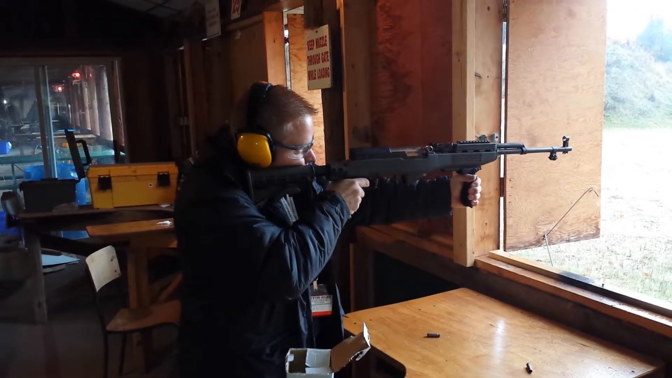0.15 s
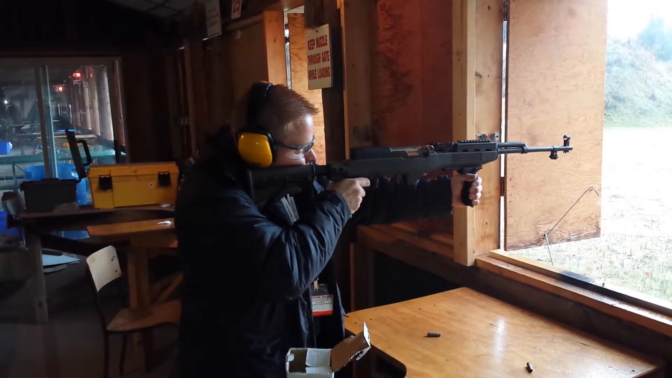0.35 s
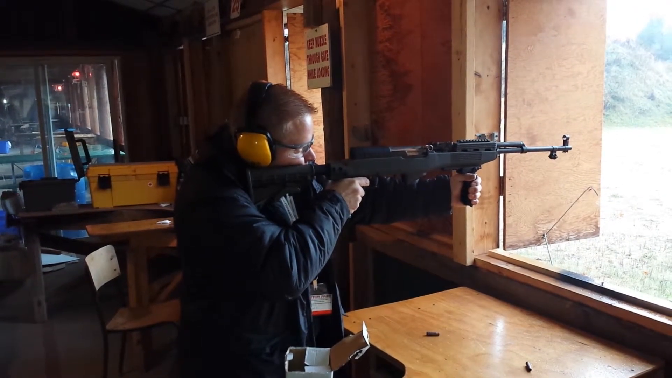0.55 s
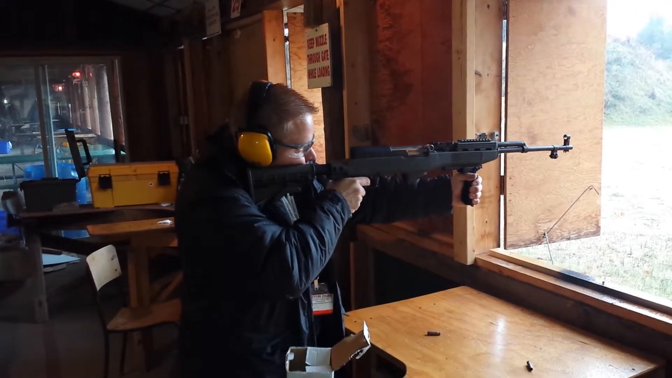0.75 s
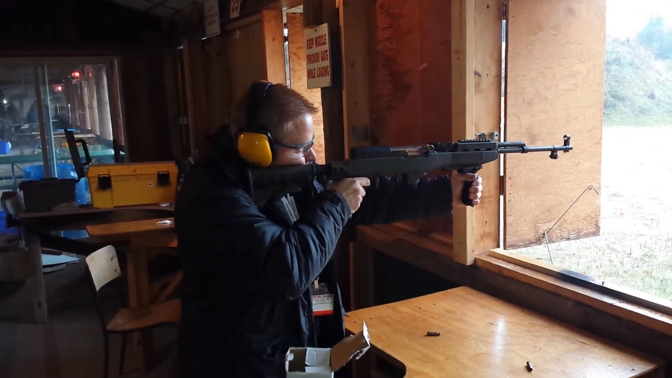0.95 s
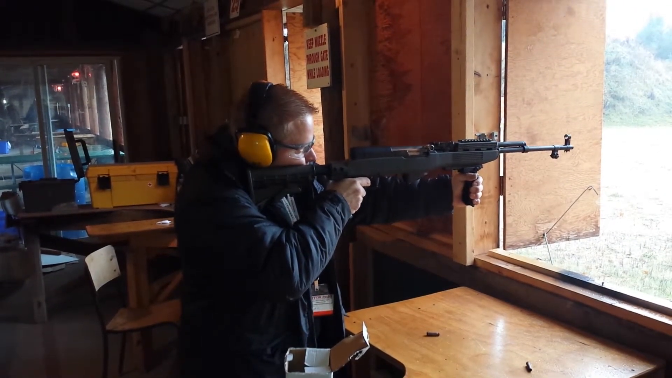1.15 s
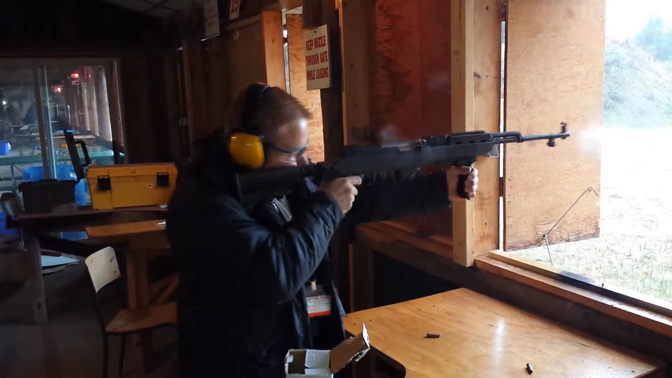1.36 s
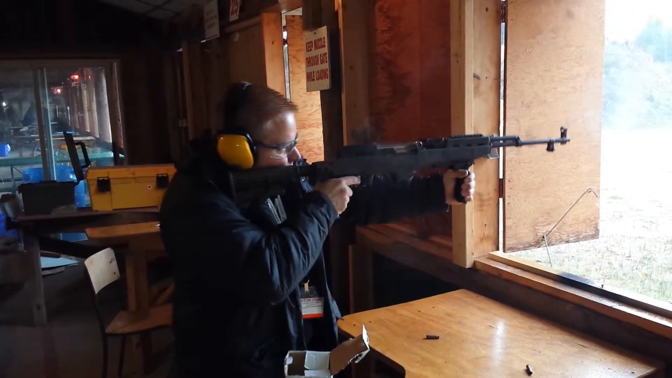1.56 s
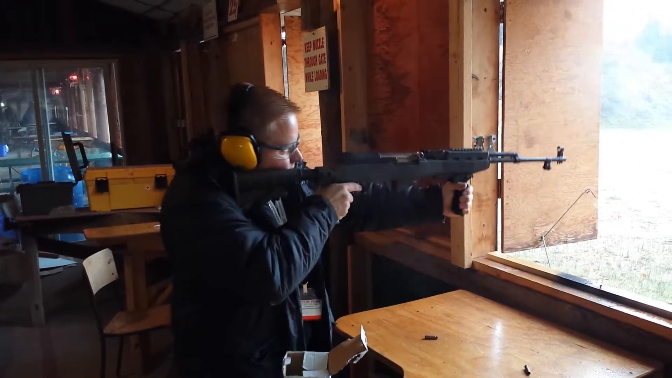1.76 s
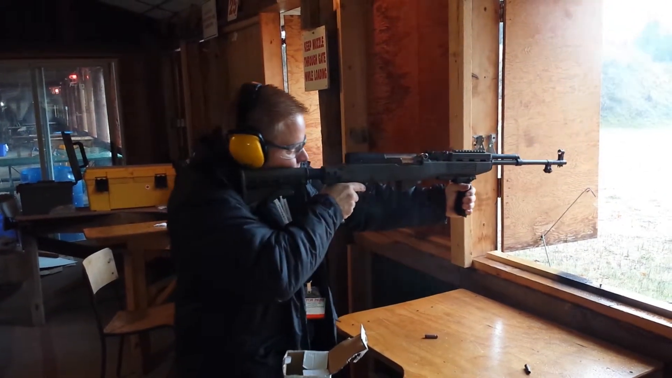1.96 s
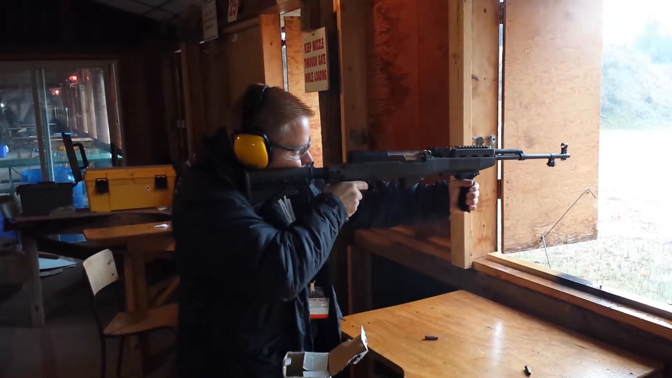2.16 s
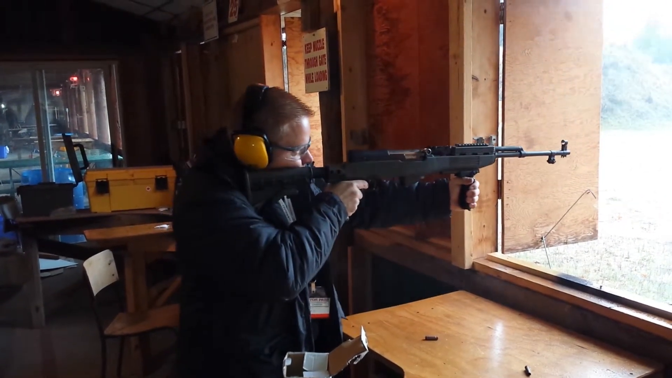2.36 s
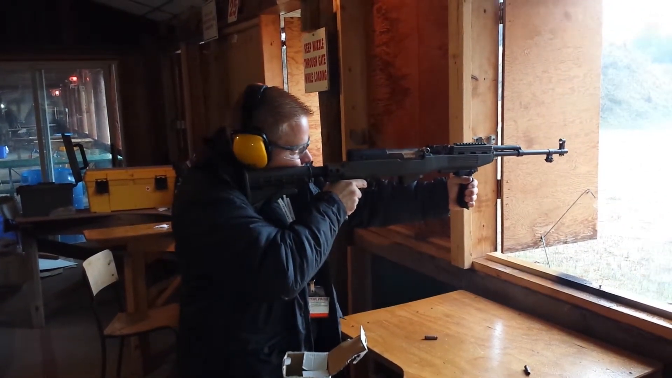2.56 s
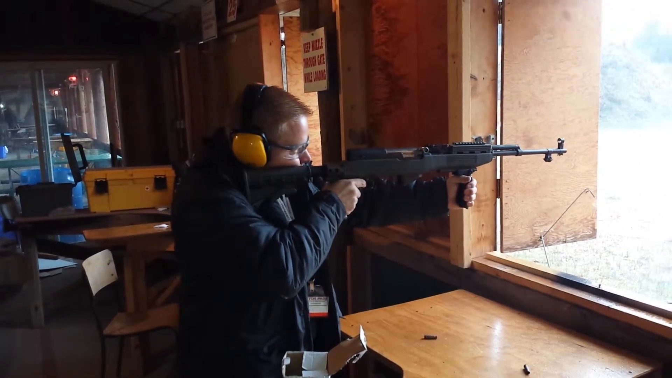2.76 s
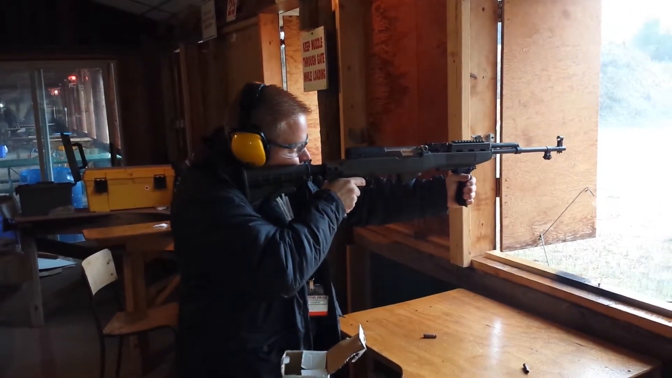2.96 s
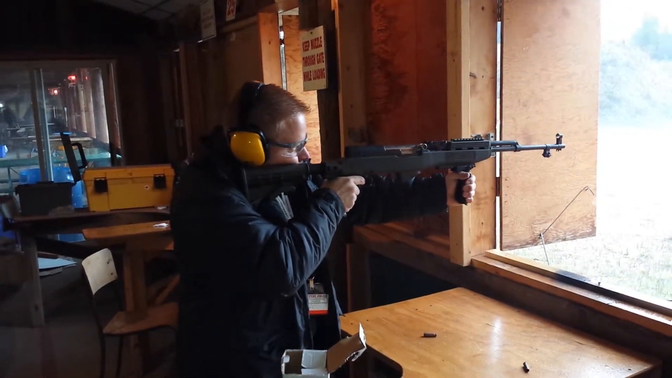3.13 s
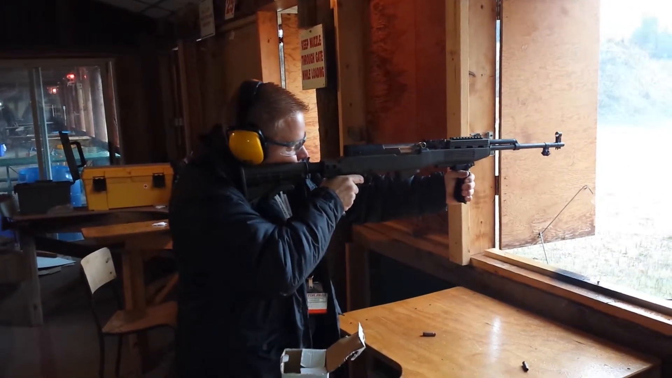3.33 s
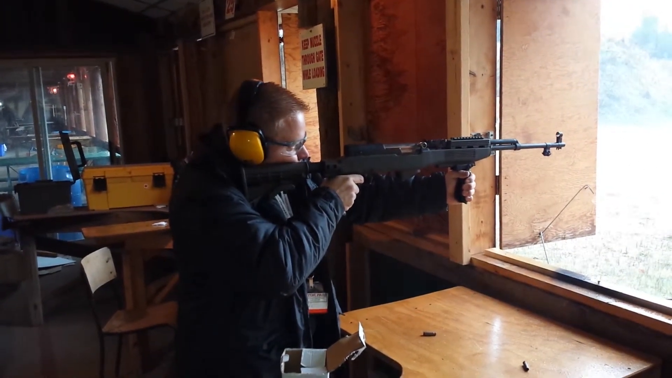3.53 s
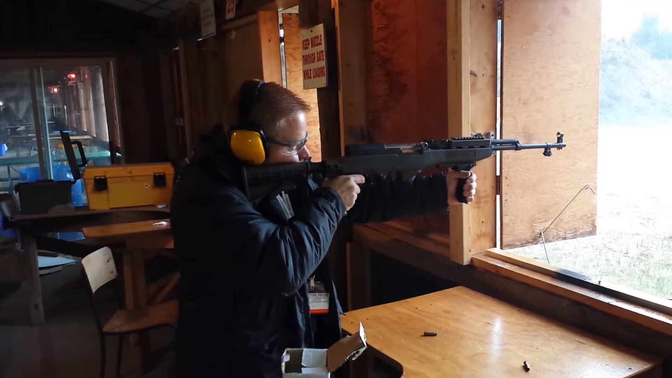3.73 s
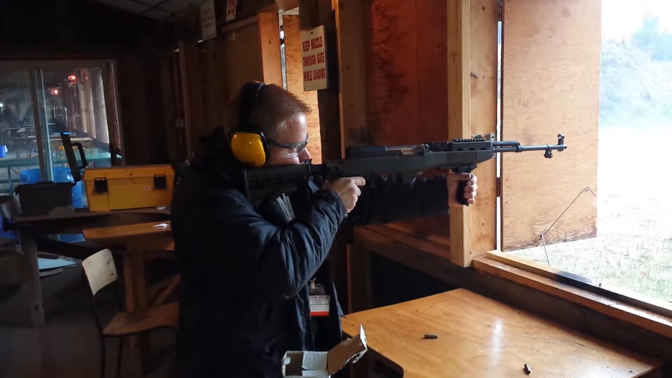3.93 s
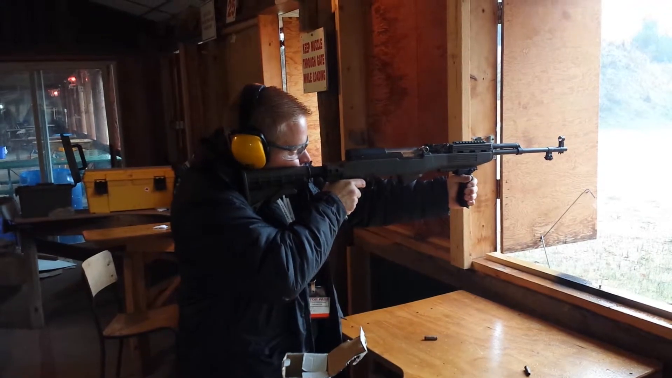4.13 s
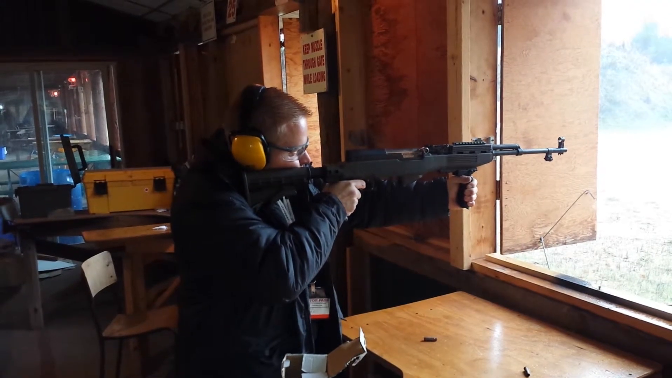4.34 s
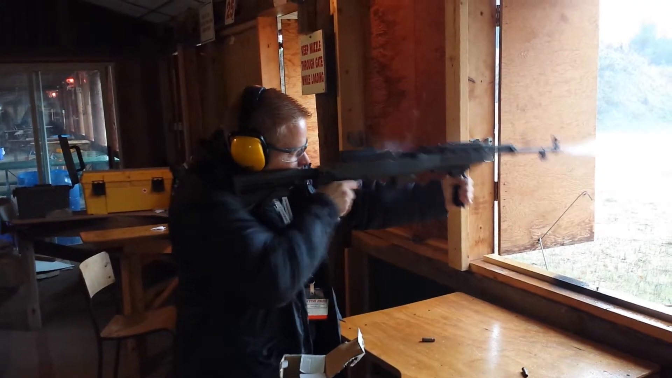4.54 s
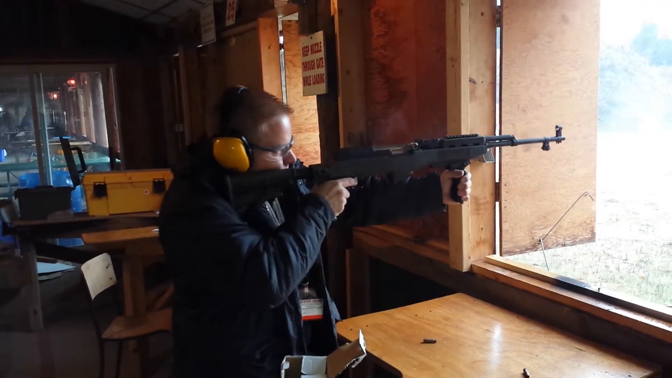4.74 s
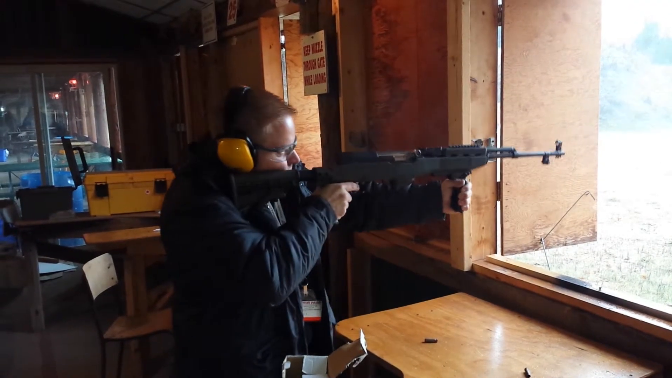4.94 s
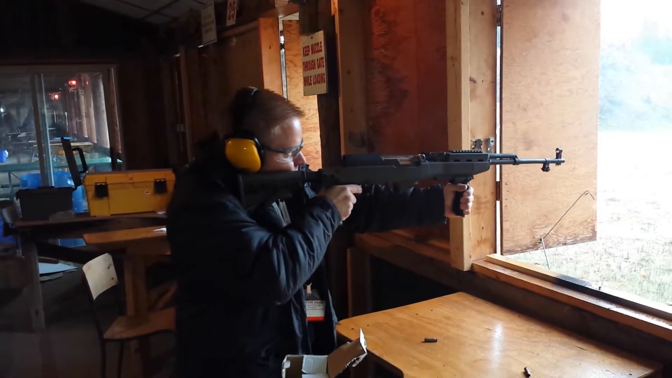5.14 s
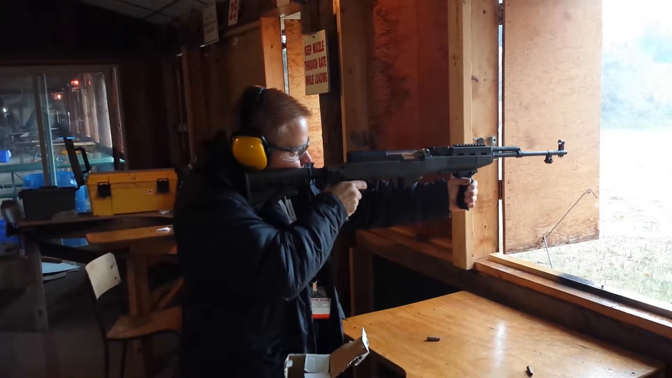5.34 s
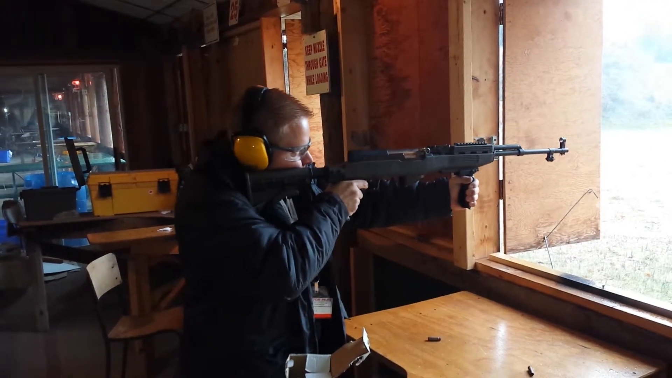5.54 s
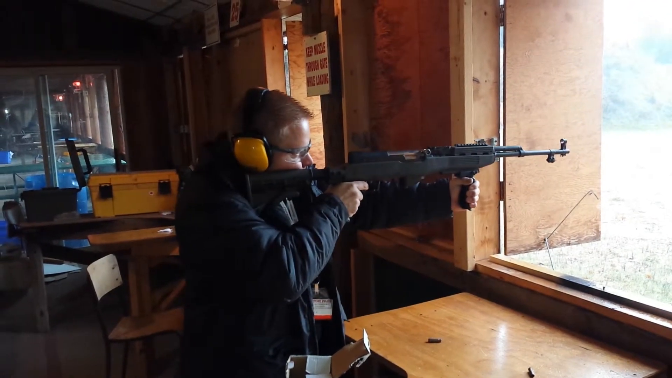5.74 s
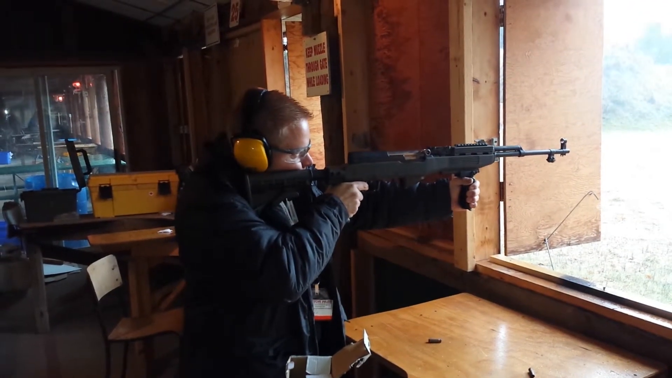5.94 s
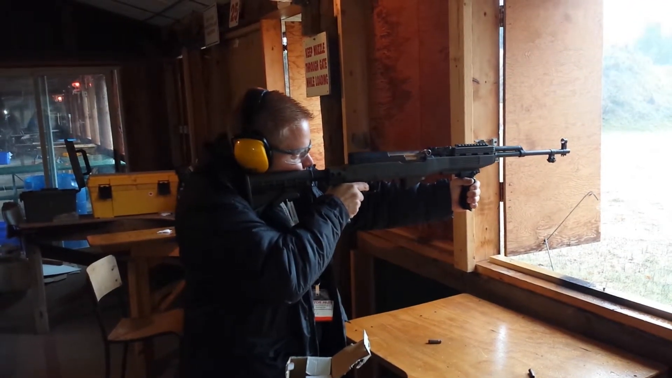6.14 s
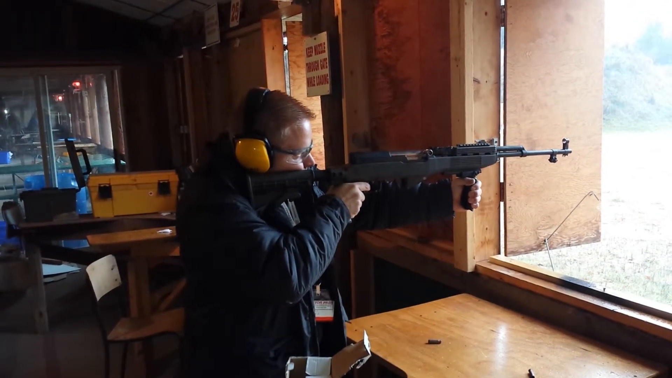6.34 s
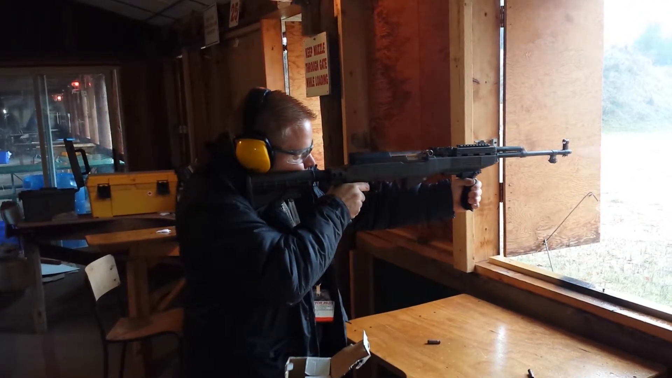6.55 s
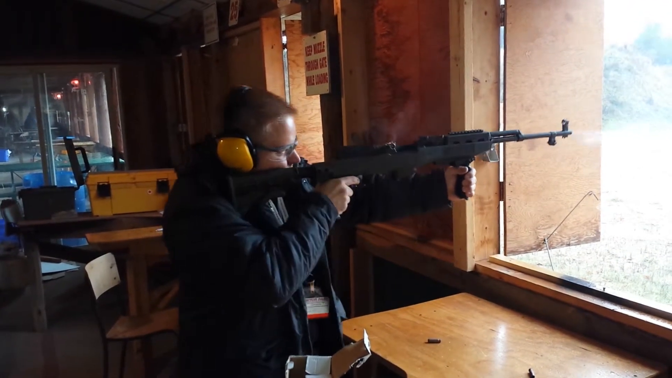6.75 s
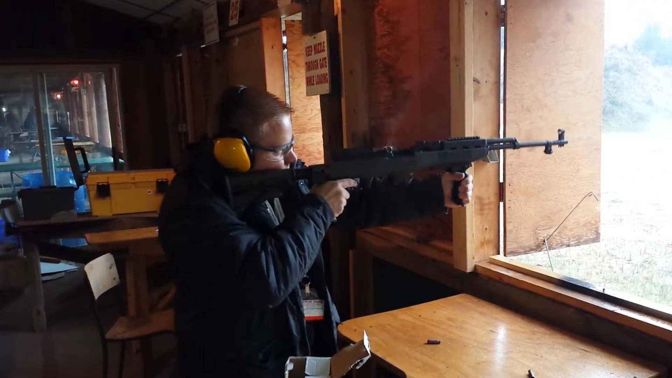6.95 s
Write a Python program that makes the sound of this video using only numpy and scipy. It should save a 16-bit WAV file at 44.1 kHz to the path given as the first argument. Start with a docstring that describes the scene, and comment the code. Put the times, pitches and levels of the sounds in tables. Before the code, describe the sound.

Three identically loud, overloaded rifle blasts, roughly three and then two seconds apart, heard a few steps away inside a wooden range shed. Background air hiss drops under each blast and swells back. Between shots come bright brass ticks on wall and floor, soft cloth brushes, small trigger clicks, a ringing metal clank after the second shot and a hollow wooden knock.

```python
"""Three rifle shots crack and boom inside a wooden shed, a few steps from two spaced microphones.
Each slaps back from the range walls, rolls away outdoors and returns from distant woods as a hollow wash.
Filtered noise makes the blasts, the open air, soft clicks, sleeve rustles and brass on wood and floor;
decaying sines ring a metal fitting. Gain control ducks the background under loud sound and lets it
swell back, while the input stage overloads."""
import sys
import numpy as np
from scipy import signal
from scipy.fft import irfft, next_fast_len
from scipy.io import wavfile
from scipy.ndimage import uniform_filter1d, minimum_filter1d

SR = 44100
rng = np.random.default_rng(int(sys.argv[2]) if len(sys.argv) > 2 else 0)


def digitize_waveform(pressure):
    """Quantize a signal to 16-bit integers and store it at the path in sys.argv[1].

    Rows of a 2-D input are taken as channels; values are limited to [-1, 1].
    """
    field = np.atleast_2d(pressure).T
    bounded = np.clip(field, -1, 1)
    quanta = np.round(bounded * 32767).astype(np.int16)
    wavfile.write(sys.argv[1], SR, quanta)


N = 312669

# Levels are those ahead of gain control; spectra give relative level per Hz.
# Open-air background: [f/Hz, level/dB]
AIR_SPECTRUM = [(15, -45), (25, -15.5), (59, -16), (121, -1), (150, -5), (301, -3), (383, -6.5), (438, -7),
                (729, -8.5), (2130, -10), (2300, -13), (4750, -16), (6370, -14), (12400, -35), (15000, -51)]
AIR_DB = -41.5
# Two spaced microphones, left minus right: [f/Hz, level/dB]
BALANCE = [(100, 1.4), (1300, 1.1), (4400, 3), (8000, 4.5), (10500, -5.5), (14000, -1.5)]
MIC_SPACING_M, SOUND_M_PER_S = 0.15, 343

# Sleeve rustles: [t/s, level/dB, decay time/s]
RUSTLES = [(.100, -40, 0.09), (.510, -39.5, .15), (1.264, -43.5, 0.23), (3.019, -37, 0.057),
           (3.088, -34, .045)]
# A quicker brush is brighter: its centre is this many cycles per decay time.
RUSTLE_CYCLES, RUSTLE_OCTAVES = 93, 2.4
# Clicks of the trigger and action: [t/s, level/dB]
CLICKS = [(.611, -36.5), (3.677, -36), (3.906, -41.5), (4.250, -43.5), (4.416, -29)]
CLICK_HZ, CLICK_OCTAVES, CLICK_S = 4920, 1, 0.044
# Each click also thuds in the stock; its level is relative to the click.
STOCK_DB, STOCK_HZ, STOCK_OCTAVES, STOCK_S = -11, 650, 0.92, 0.09
# Resonances colouring the handling sounds, added to a flat response: [f/Hz, half-width/Hz, level/dB]
HANDLING_MODES = [(3300, 180, -6), (6500, 250, 0)]

# Shots: [t/s, level/dB of the ejected case's tick on the wall]
SHOTS = [(1.3557, 1), (4.6011, -11), (6.6341, 0)]
# Every cartridge is equally loud.
CRACK_DB, BOOM_DB = 27.5, 23.5
# Muzzle crack: [f/Hz, level/dB]
CRACK_SPECTRUM = [(40, -20), (150, -14.5), (600, -14), (1500, -10.5), (3000, -7.5), (5000, -3), (6500, -2),
                  (8000, -4.5), (11000, -12.5), (15000, -23.5)]
# Boom inside the shed: [f/Hz, level/dB]
BOOM_SPECTRUM = [(25, -28), (60, -15.5), (120, -6), (200, -8), (250, -2.5), (320, -4.5), (450, -3),
                 (900, -2), (1500, -2.5), (2300, -3.5), (3500, -7), (6800, -6), (9000, -13.5), (10500, -24),
                 (12000, -42), (14000, -52)]
# Blast thrown back by the range walls: [f/Hz, level/dB]
SLAP_SPECTRUM = [(30, -25.5), (70, -16), (125, -4), (190, -8), (250, -4.5), (320, -9), (440, 3),
                 (750, -3.5), (1900, -1.5), (2700, -6), (4000, -8.5), (6500, -9), (9500, -22), (13000, -44)]
# Outdoor roll: [f/Hz, level/dB]
ROLL_SPECTRUM = [(25, -26.5), (70, -15.5), (105, -4.5), (145, 2.5), (200, -2.5), (260, -1), (340, -6),
                 (500, -11.5), (1000, -8), (3000, -14.5), (6500, -22.5), (10000, -41.5), (14000, -62.5)]
# Decay by 60 dB of the boom in the shed: [f/Hz, t60/s]
SHED_T60 = [(60, 0.69), (150, 0.81), (500, 0.64), (1500, 0.58), (4000, 0.62), (7000, 0.6), (12000, 0.47)]
# Decay by 60 dB of the outdoor roll: [f/Hz, t60/s]
ROLL_T60 = [(60, 3.2), (140, 2.34), (500, 2.31), (2000, 2.12), (8000, 1.5)]
# Standing waves between the shed's walls, added to a flat response: [f/Hz, half-width/Hz, level/dB]
SHED_MODES = [(134.4, 5.4, 3.5), (428.7, 6.6, 3), (478.7, 4.9, 1.5), (502, 5.1, 2.5), (766, 9, 5),
              (1116, 7, -0.5), (1465, 6.2, -1.5)]

# The action throws every case alike, so it ticks on the wall after the same flight.
FLIGHT_S, WALL_HZ, WALL_OCTAVES, WALL_CONTACT_S = 0.27, 6000, 0.35, 0.003
# Falling cases striking wood and metal: [t/s, level/dB, centre f/Hz, contact decay/s]
STRIKES = [(1.984, -6.5, 7240, .013), (5.182, 8.5, 5940, 0.04), (5.724, -19, 4900, 0.011)]
STRIKE_OCTAVES = 0.45
# Extra treble decay, as air and bare wood soak up reverberation: [f/Hz, t60/s]
DAMPING_T60 = [(4000, 20), (7000, 4.7), (10000, 0.95)]

# Cases hopping on the floor: [t/s, level/dB, tilt (0 flat, 1 on end), pitch factor of the low modes]
BOUNCES = [(1.984, -18, 0.47, 1.04), (2.509, -19.5, 0.79, 1), (2.703, -30, 0.99, 1.08),
           (2.767, -39, 0.33, 1), (2.840, -35, 0.28, 1.06), (5.486, -31, 0.92, 1), (5.724, -34, .45, 1.02),
           (5.936, -33, .93, 1.09), (6.010, -36, 0.38, 1.03)]
# Tick of brass on the floor: [f/Hz, level/dB]
TICK_SPECTRUM = [(200, -12), (1500, -3.5), (4000, -1), (6500, 1.5), (9000, -5.5), (11000, -30),
                 (15000, -25)]
# Low modes of a brass case, before the pitch factor: [f/Hz, half-width/Hz, level/dB]
CASE_MODES = [(2105, 80, -1.5), (6750, 240, -4)]
# Top mode of the case from the first and from the second shot: [f/Hz]
CASE_TOP_HZ = [12960, 13560]

# Echo from the woods: [f/Hz, level/dB]
WOODS_SPECTRUM = [(100, -30), (400, -10), (650, -0.5), (850, -3.5), (1150, -6), (1600, -31), (4000, -52)]
# Metal fitting rung by one case: [f/Hz, level/dB, t60/s]
FITTING_MODES = [(3646, 6, 0.32), (3725, -3, 0.22), (3865, 1, 0.2), (6643, 3, 0.12), (7430, 1, .18),
                 (7760, -10, 0.18), (7870, -4, .2)]
FITTING_S = 5.183
# Board knocked by a falling case: [f/Hz, half-width/Hz, level/dB]
BOARD_MODES = [(540, 120, -10), (690, 60, -1), (810, 120, 0), (1170, 70, -4), (1480, 230, -4),
               (1935, 130, 3), (2260, 81, -6), (2660, 240, -5.5)]
BOARD_S = 5.7235
# Upper limit of the recorded band
EDGE_HZ = 14750


def amp(db):
    """Amplitude factor of a level in dB."""
    return 10 ** (np.asarray(db) / 20)


def evened(x):
    """Scales a sound or curve to unit RMS."""
    return x / np.sqrt(np.mean(x ** 2) + 1e-20)


def read(points, hz):
    """Reads a table's second column between its points, on a log frequency scale."""
    f, value = np.transpose(points)
    return np.interp(np.log(hz + 1), np.log(f + 1), value)


def add(mix, s, sound):
    """Lays a sound into the mix at time s, cut at the mix's end."""
    part = mix[:, round(s * SR):][:, :sound.shape[1]]
    part += sound[:, :part.shape[1]]


def axes(size):
    """Sample times and spectrum frequencies of a sound of this size."""
    return np.arange(size) / SR, np.fft.rfftfreq(size, 1 / SR)


def peaks(modes, hz):
    """Summed gain of resonances, each at half its peak one half-width away."""
    return sum(amp(db) / (1 + ((hz - f) / width) ** 2) for f, width, db in modes)


def hump(hz, centre_hz, octaves):
    """Bell-shaped gain on a scale of octaves."""
    return np.exp(-0.5 * (np.log2((hz + 1) / centre_hz) / octaves) ** 2)


def diffuse(gain, likeness=0.99):
    """Sound from all sides at two spaced microphones: alike in the bass, unrelated in the treble."""
    hz = np.linspace(0, SR / 2, len(gain))
    a, b = rng.standard_normal((2, len(hz))) + 1j * rng.standard_normal((2, len(hz)))
    same = likeness * np.sinc(2 * hz * MIC_SPACING_M / SOUND_M_PER_S)
    lean = amp(read(BALANCE, hz) / 2)  # half the balance on each side
    left = a * lean
    right = (same * a + np.sqrt(1 - same ** 2) * b) / lean
    return evened(irfft(gain * np.array([left, right])))


def fade(x, t60):
    """Lets each frequency band die at its own speed."""
    hz, t, bands = signal.stft(x, SR, nperseg=512)
    bands = bands * amp(-60 * t / read(t60, hz)[:, None])
    return signal.istft(bands, SR)[1][:, :x.shape[1]]


def swell(t, delay_s, rise_s, fall_s):
    """Envelope of a scattered echo: smooth rise around the delay, then exponential fall."""
    rise = (1 + np.tanh((t - delay_s) / rise_s)) / 2
    return rise * np.exp(-np.maximum(t - delay_s, 0) / fall_s)


def wander(t, low_hz, high_hz):
    """Random curve of unit RMS, a sum of sines with random phases."""
    rates = np.geomspace(low_hz, high_hz, 20)
    return evened(sum(np.sin(2 * np.pi * (f * t + rng.random())) for f in rates))


def knock(gain, contact_s, room_db=-7):
    """A decaying contact over a short room tail, which a brief tick feeds less."""
    sound = diffuse(gain)
    t = np.arange(sound.shape[1]) / SR
    fed = min(np.sqrt(contact_s / 0.015), 1)
    room = amp(room_db) * fed * np.exp(-t / 0.06)
    attack = np.minimum(t / 0.001, 1)
    return sound * np.hypot(np.exp(-t / contact_s), room) * attack


def air():
    """The steady hiss and rumble of the open air, as shaped diffuse noise."""
    _, hz = axes(size=2 * next_fast_len(N // 2 + 1))
    return (amp(AIR_DB) * diffuse(amp(read(AIR_SPECTRUM, hz))))[:, :N]


def handling_colour(hz, dull_hz=8000):
    """Two resonances under a treble roll-off."""
    return (1 + peaks(HANDLING_MODES, hz)) / (1 + (hz / dull_hz) ** 6)


def rustles(rise_s=0.004):
    """Sleeve brushes: broad noise, brighter for a quicker stroke."""
    t, hz = axes(size=SR)
    out = np.zeros((2, N))
    onset = np.minimum(t / rise_s, 1)
    for s, db, length_s in RUSTLES:
        gain = handling_colour(hz) * hump(hz, RUSTLE_CYCLES / length_s, RUSTLE_OCTAVES)
        add(out, s, amp(db) * onset * knock(gain, length_s, room_db=-6.5))
    return out


def clicks(rise_s=0.004):
    """Trigger and action click softly through two resonances, with a thud in the stock."""
    t, hz = axes(size=SR)
    out = np.zeros((2, N))
    onset = np.minimum(t / rise_s, 1)
    for s, db in CLICKS:
        click = knock(handling_colour(hz) * hump(hz, CLICK_HZ, CLICK_OCTAVES), CLICK_S)
        thud = knock(hump(hz, STOCK_HZ, STOCK_OCTAVES), STOCK_S)
        add(out, s, amp(db) * onset * (click + amp(STOCK_DB) * thud))
    return out


def boom(build_s=0.06, slap_db=-8, slap_s=0.098, slap_rise_s=0.013, slap_fall_s=0.043,
         roll_db=-29.5, roll_build_s=0.076, lumps_db=1.24):
    """The blast builds up in the shed, slaps back from the range walls and rolls away in uneven lumps."""
    t, hz = axes(size=2 * SR)
    shed = 1 + peaks(SHED_MODES, hz)
    inside = fade(diffuse(amp(read(BOOM_SPECTRUM, hz)) * shed, likeness=0.75), SHED_T60)
    inside = inside * (1 - np.exp(-t / build_s))
    slap = diffuse(amp(read(SLAP_SPECTRUM, hz)) * shed, likeness=0.7)
    slap = slap * swell(t, slap_s, slap_rise_s, slap_fall_s)
    roll = fade(diffuse(amp(read(ROLL_SPECTRUM, hz)) * shed, likeness=0.95), ROLL_T60)
    roll = roll * (1 - np.exp(-t / roll_build_s))
    lumps = amp(lumps_db * wander(t, 12, 90))
    return (inside + amp(slap_db) * slap + amp(roll_db) * roll) * lumps


def shots(crack_s=0.049, front_s=0.0058):
    """A bright decaying crack with the boom; the muzzle barely moves, so much of the echo repeats."""
    t, hz = axes(size=2 * SR)
    out = np.zeros((2, N))
    usual = boom()
    front = np.minimum(t / front_s, 1) ** 3
    for s, _ in SHOTS:
        crack = diffuse(amp(read(CRACK_SPECTRUM, hz)), likeness=0.3) * np.exp(-t / crack_s)
        echoes = (usual + boom()) / np.sqrt(2)  # half shared, half new, by power
        add(out, s, front * (amp(CRACK_DB) * crack + amp(BOOM_DB) * echoes))
    return out


def wall_ticks():
    """Each ejected case makes one brief, bright contact with the wall."""
    _, hz = axes(size=SR)
    out = np.zeros((2, N))
    for s, db in SHOTS:
        tick = knock(hump(hz, WALL_HZ, WALL_OCTAVES), WALL_CONTACT_S, room_db=-6.5)
        add(out, s + FLIGHT_S, amp(db) * tick)
    return out


def strikes():
    """Falling brass hits wood and metal: sharp contacts whose treble is soaked up."""
    _, hz = axes(size=SR)
    out = np.zeros((2, N))
    for s, db, centre_hz, contact_s in STRIKES:
        hit = knock(hump(hz, centre_hz, STRIKE_OCTAVES), contact_s, room_db=-5.5)
        add(out, s, amp(db) * fade(hit, DAMPING_T60))
    return out


def bounces(tick_s=0.0084, low_db=1, ring_s=0.022, top_width_hz=55, top_s=0.038):
    """Cases tick on the floor; on end they ring the tube's low modes, flat its top mode."""
    _, hz = axes(size=SR)
    out = np.zeros((2, N))
    for s, db, tilt, pitch in BOUNCES:
        top_hz = CASE_TOP_HZ[int(s > SHOTS[1][0])]  # after the second shot, its own case
        angle = tilt * np.pi / 2
        tick = knock(amp(read(TICK_SPECTRUM, hz)), tick_s, room_db=-5)
        low = amp(low_db) * knock(peaks(CASE_MODES, hz / pitch), ring_s, room_db=-8.5)
        top = knock(peaks([(top_hz, top_width_hz, 0)], hz), top_s, room_db=-13)
        add(out, s, amp(db) * (tick + np.sin(angle) * low + np.cos(angle) * top))
    return out


def woods(echo_db=-33.5, delay_s=1.22, rise_s=0.034, fall_s=0.41):
    """Far trees scatter each shot back as a soft, hollow wash."""
    t, hz = axes(size=3 * SR)
    out = np.zeros((2, N))
    for s, _ in SHOTS:
        wash = diffuse(amp(read(WOODS_SPECTRUM, hz)))
        add(out, s, amp(echo_db) * swell(t, delay_s, rise_s, fall_s) * wash)
    return out


def fitting(clank_db=-5, clank_hz=2700, clank_octaves=0.47, clank_s=0.024,
            wash_width_hz=25, wash_s=0.051):
    """A struck metal fitting clanks and rings in pure modes, smeared by reflections into a beating wash."""
    t, hz = axes(size=SR)
    out = np.zeros((2, N))
    clank = knock(hump(hz, clank_hz, clank_octaves), clank_s, room_db=-5.5)
    add(out, FITTING_S, amp(clank_db) * clank)
    for f, db, t60 in FITTING_MODES:
        tone = np.sin(2 * np.pi * (f * t + rng.random((2, 1))))
        add(out, FITTING_S, amp(db - 60 * t / t60) * tone)
    smeared = [(f, wash_width_hz, db) for f, db, _ in FITTING_MODES]
    add(out, FITTING_S, knock(peaks(smeared, hz), wash_s))
    return out


def board(board_db=-6.5, board_s=0.046):
    """A falling case knocks a board, whose resonances sound hollow."""
    _, hz = axes(size=SR)
    out = np.zeros((2, N))
    add(out, BOARD_S, amp(board_db) * knock(peaks(BOARD_MODES, hz), board_s, room_db=-5))
    return out


def scene():
    """Sums all sources as they reach the microphones."""
    background = air() + rustles() + clicks()
    brass = wall_ticks() + strikes() + bounces() + fitting() + board()
    return background + shots() + brass + woods()


def duck(x, threshold_db=-15, depth_db=17, hold_s=0.85, recover_db_per_s=23, ahead_s=0.0063):
    """Gain control with look-ahead: drops quickly on loud sound, holds, then creeps back up."""
    power_db = 10 * np.log10(abs(uniform_filter1d((x ** 2).mean(0), size=400)) + 1e-12)
    over_db = np.clip(power_db - threshold_db, 0, depth_db)
    half = int(hold_s * SR / 2)
    shift = half - int(ahead_s * SR)  # window reaches mostly into the past
    held_db = -minimum_filter1d(-over_db, 2 * half + 1, origin=shift, mode="nearest")
    fall = np.arange(N) * recover_db_per_s / SR
    reduction_db = np.maximum.accumulate(held_db + fall) - fall
    return x * amp(-uniform_filter1d(reduction_db, size=700))


def overload(x, ceiling=0.87):
    """The input stage bends smoothly towards its ceiling."""
    return x / (1 + (x / ceiling) ** 4) ** 0.25


def record(dry, low_cut_hz=40):
    """Gain control, an overloaded input stage, the band limits and full scale."""
    driven = overload(duck(dry))
    driven = signal.lfilter(*signal.butter(1, low_cut_hz, "high", fs=SR), driven)
    band = signal.firwin(511, EDGE_HZ, window=("kaiser", 9), fs=SR)
    return np.clip(signal.oaconvolve(driven, band[None], "same"), -1, 1)


dry = scene()
out = record(dry)
digitize_waveform(out)
```